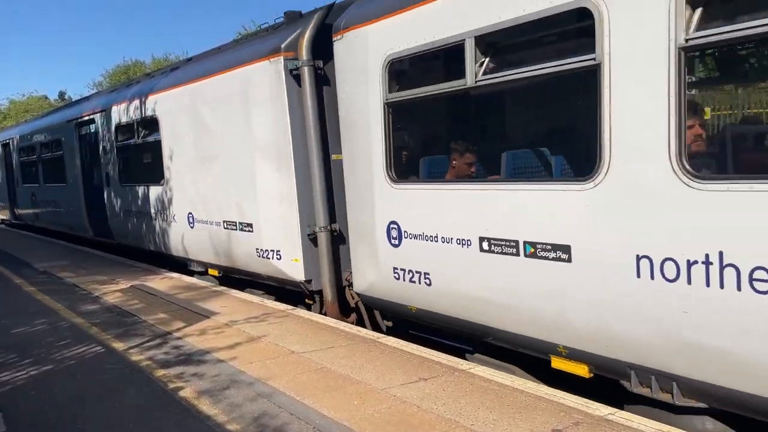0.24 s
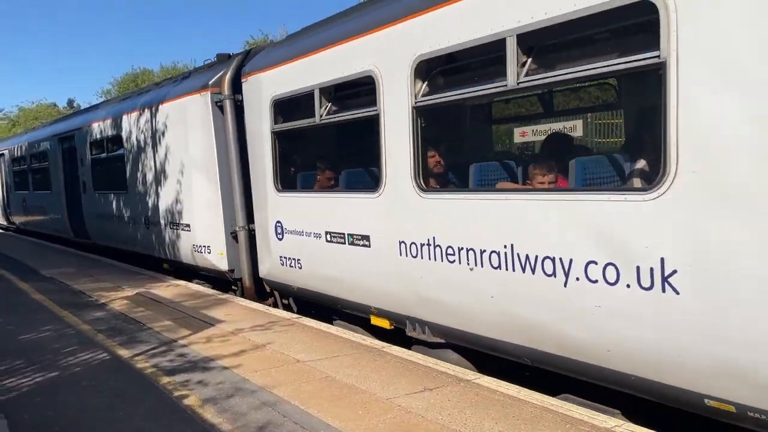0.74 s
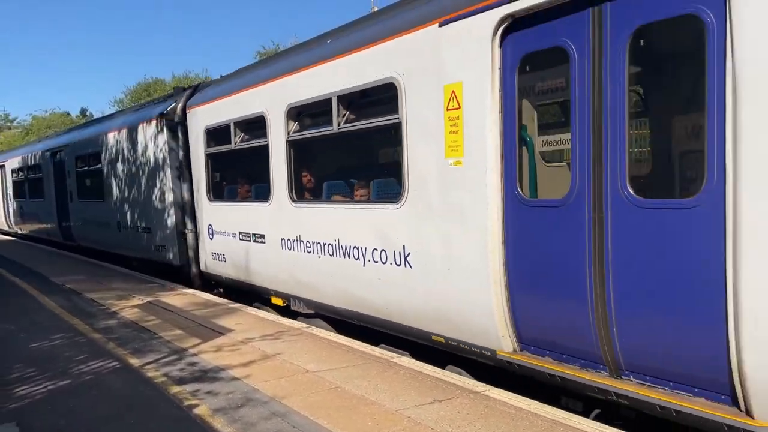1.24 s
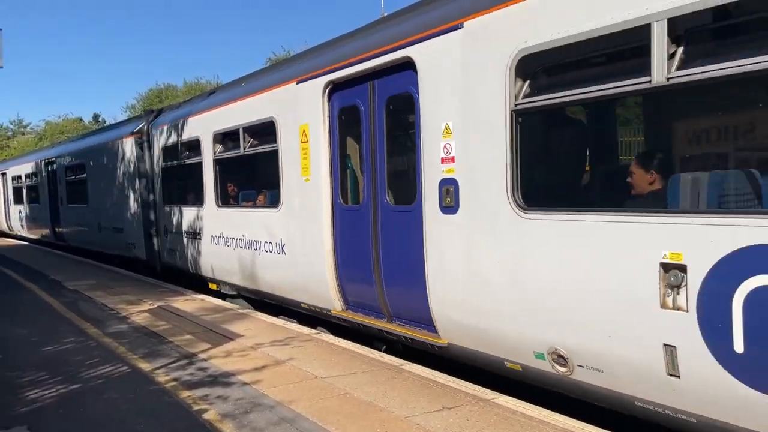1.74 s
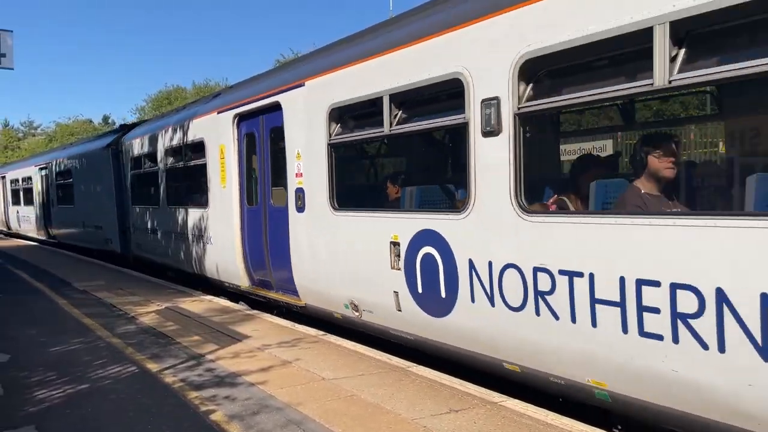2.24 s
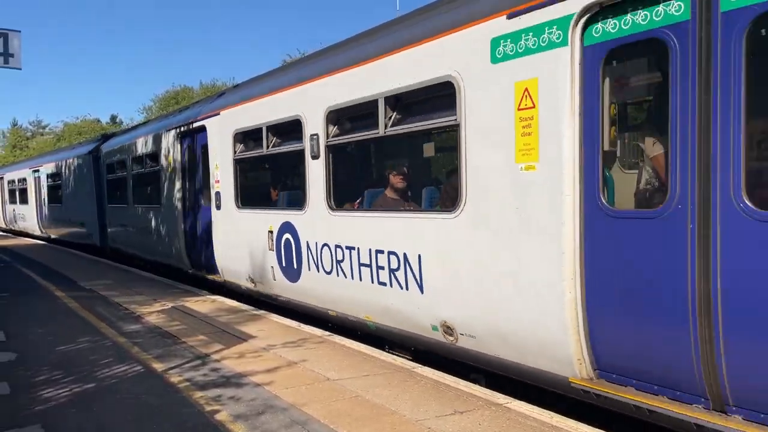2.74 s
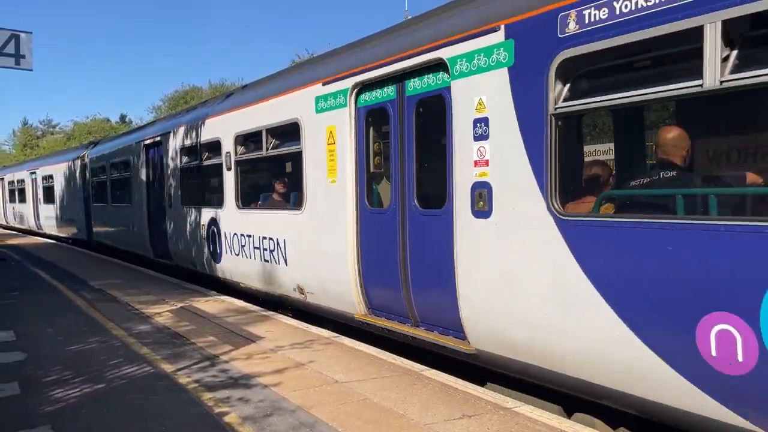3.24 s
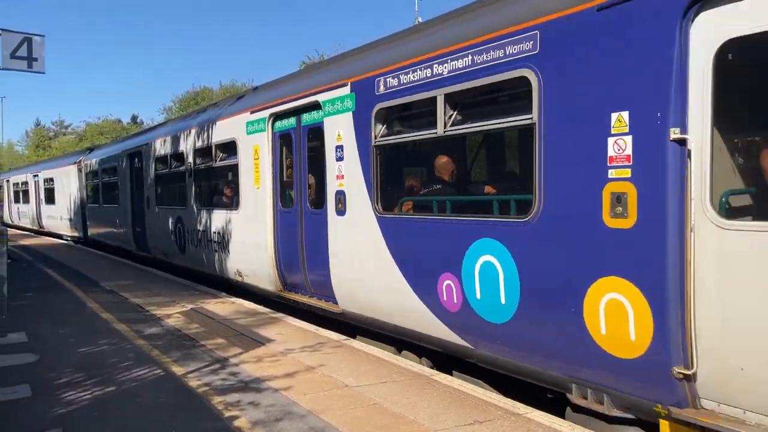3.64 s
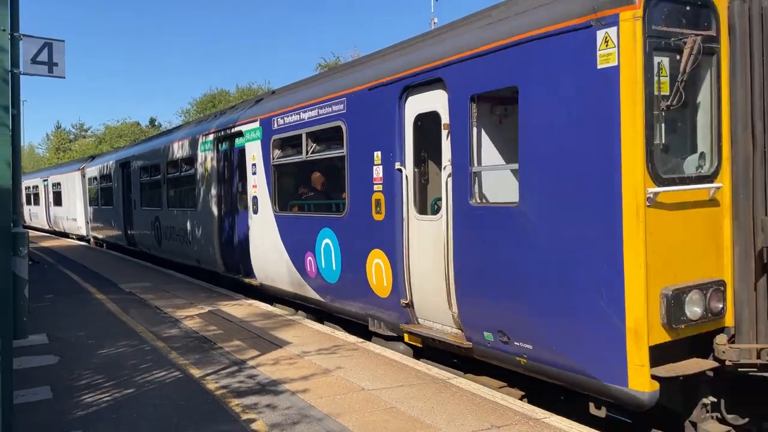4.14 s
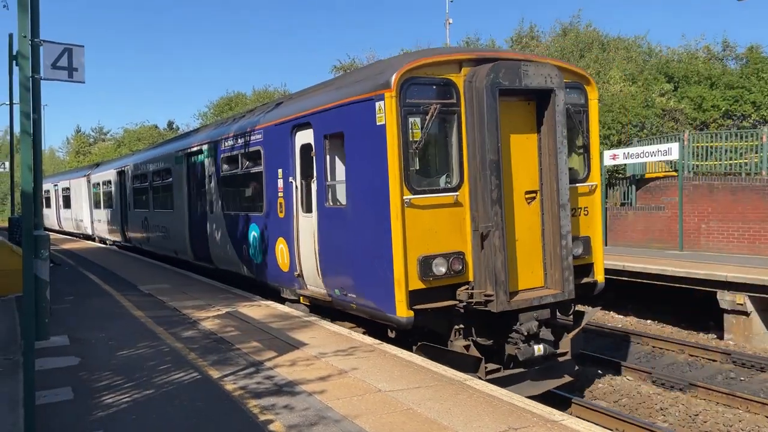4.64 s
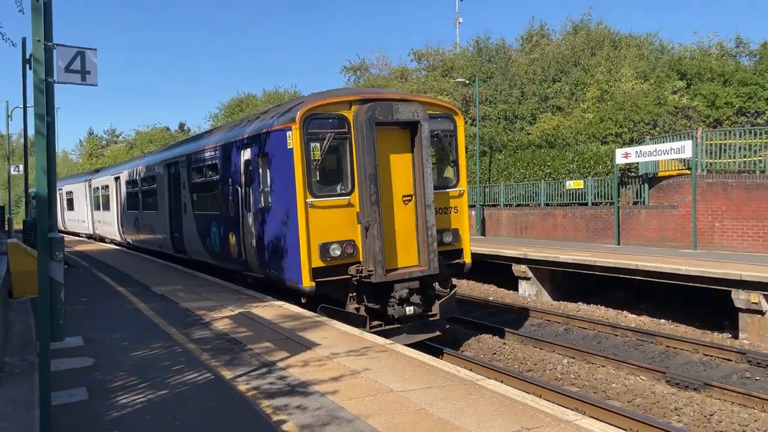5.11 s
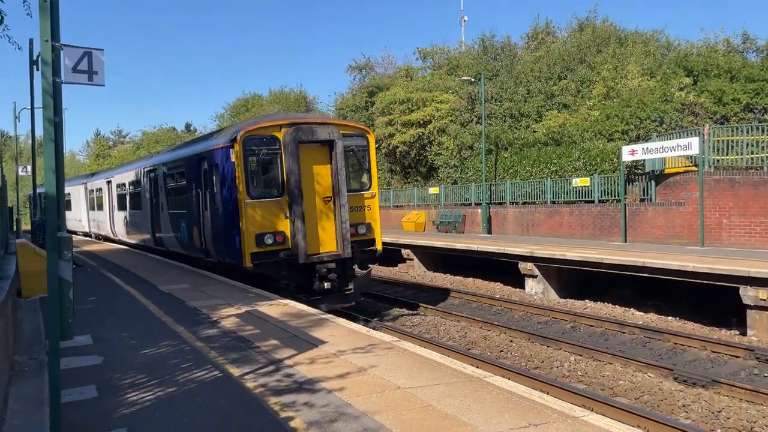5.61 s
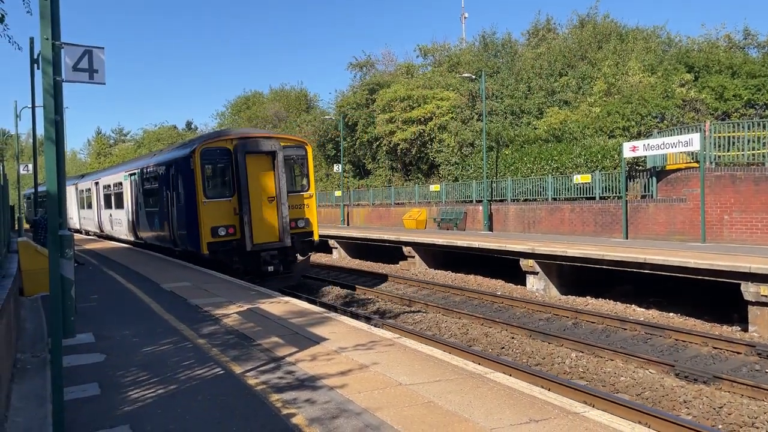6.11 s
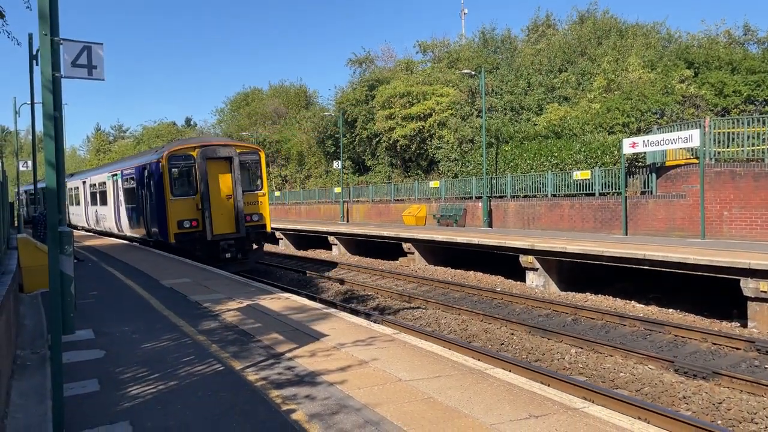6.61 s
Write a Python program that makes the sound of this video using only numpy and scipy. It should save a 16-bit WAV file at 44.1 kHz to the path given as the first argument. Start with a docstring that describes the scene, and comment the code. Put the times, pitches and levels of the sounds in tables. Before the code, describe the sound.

A diesel passenger train rolls past close by with droning engine, roar and airy hiss, then recedes before a knock and whistling air-valve blast.

```python
"""A diesel railcar's engine drone, rolling roar and cooling-air hiss pull away from an open platform.
Crank-speed orders make the exhaust and engine tones; shaped, flickering noise makes the roar and hiss.
Thin whines and a few low thuds pass. Near the end an air valve knocks open and blows through a short
pipe for a second: a noise jet plus ringing pipe resonances. Stereo is narrow in the lows, wider above."""
import sys
import numpy as np
from scipy import signal
from scipy.fft import rfft, irfft, next_fast_len
from scipy.io import wavfile

SR = 44100
rng = np.random.default_rng(int(sys.argv[2]) if len(sys.argv) > 2 else 0)


def dump_mix(stems):
    """Bounce the given channels to the path in sys.argv[1] as a 16-bit WAV at rate SR."""
    frames = np.atleast_2d(stems).T  # one column per channel
    limited = np.clip(frames, -1, 1)  # hard clip at full scale
    pcm = np.round(limited * 32767).astype(np.int16)
    wavfile.write(sys.argv[1], SR, pcm)


N = 302526


def from_db(db):
    """Amplitude gain of a level in dB."""
    return 10 ** (np.asarray(db) / 20)


def rms_one(x):
    """Scale to unit power."""
    return x / np.sqrt(np.mean(x ** 2) + 1e-20)


def after(start_s):
    """Seconds since start_s, zero before it."""
    return np.maximum(np.arange(N) / SR - start_s, 0)


def ramp(start_s, rise_s):
    """Straight rise from 0 to 1."""
    return np.clip(after(start_s) / rise_s, 0, 1)


def bell(center_s, spread_s):
    """Gaussian swell of peak 1."""
    return np.exp(-0.5 * ((after(0) - center_s) / spread_s) ** 2)


def in_time(rows):
    """Interpolate each column of a time table to every sample."""
    time_s, *columns = np.transpose(rows)
    return [np.interp(np.arange(N) / SR, time_s, column) for column in columns]


def shaped(x, points):
    """Filter by (frequency [Hz], gain [dB]) points joined on a log-frequency axis."""
    size = next_fast_len(N + 8192)
    hz = np.maximum(np.arange(size // 2 + 1) * SR / size, 1)
    point_hz, point_db = np.transpose(points)
    gain = from_db(np.interp(np.log(hz), np.log(point_hz), point_db))
    return irfft(rfft(x, size) * gain, size)[..., :N]


def drift(rate_hz):
    """Slow random curve of RMS 1: white noise through a two-pole low-pass at SR / 40."""
    r = np.exp(-80 * np.pi * rate_hz / SR)
    white = rng.standard_normal(N // 40 + 2002)
    slow = signal.lfilter([1], [1, -2 * r, r * r], white)[2000:]  # settled part
    return np.interp(np.arange(N) / 40, np.arange(len(slow)), rms_one(slow))


def noise(spectrum, patchy_db):
    """Two unrelated draws of coloured noise that flicker together."""
    coloured = rms_one(shaped(rng.standard_normal((2, N)), spectrum))
    return coloured * from_db(patchy_db * drift(12.7))


def whistles(modes, flicker_db, wander=0):
    """Noise-driven resonances, each with its own flicker; pitch strays by the share wander."""
    out, steps = np.zeros((2, N)), np.arange(N)
    for hz, width_hz, level_db in modes:
        r = np.exp(-np.pi * width_hz / SR)
        poles = [1, -2 * r * np.cos(2 * np.pi * hz / SR), r * r]
        ringing = signal.lfilter([1, 0, -1], poles, rng.standard_normal((2, N)))
        if wander:
            slip = np.cumsum(wander * drift(1.2))
            read = np.abs(steps + slip - slip[-1] * steps / N)  # ends in step again
            ringing = np.array([np.interp(read, steps, row) for row in ringing])
        level = from_db(level_db + flicker_db * drift(8.5))
        out += level * np.sqrt(width_hz) * rms_one(ringing)
    return rms_one(out)


def tone(phase):
    """A sine; its shared and differing parts stand a quarter cycle apart."""
    return np.sqrt(2) * np.array([np.sin(phase), np.cos(phase)])


# Crankshaft speed as heard, sinking as the train draws away: (time [s], speed [turns/s])
CRANK_SPEED = [(0, 31.68), (.65, 31.6), (1.45, 31.4), (2.65, 31.28), (3.85, 31.2), (4.65, 31.1),
               (5.85, 30.93), (6.86, 30.78)]


def crank_angle():
    """Crank angle in radians: running sum of the speed."""
    return 2 * np.pi * np.cumsum(in_time(CRANK_SPEED)[0]) / SR


# Roof exhaust, firing note (3rd order): (time [s], level [dB])
FIRING_LEVEL = [(0.0, -12.5), (0.05, -14.5), (0.32, -12.5), (1.18, -18), (1.57, -18), (1.97, -26.5),
                (2.33, -20), (2.64, -24), (2.69, -28), (2.86, -25), (2.92, -28), (3.36, -24.5),
                (3.44, -24.5), (4.24, -24), (4.57, -31), (4.87, -26), (4.97, -30), (5.06, -26.5),
                (5.16, -31.5), (5.6, -33), (5.66, -26.5), (5.98, -32), (6.04, -39), (6.09, -32),
                (6.74, -31.5), (6.86, -37)]
# Mean levels under random swells:
# (time [s], 6th order [dB], 7.5th [dB], 8th [dB], 9th [dB], 11th [dB])
OVERTONE_LEVELS = [(0, -32, -36, -33, -34, -23), (.6, -37, -46, -38, -31, -22),
                   (1.0, -35, -29, -39, -38, -29.5), (1.4, -42, -31.5, -37, -40, -27),
                   (2.2, -34, -37, -35.5, -39.5, -40.5), (3.1, -31.5, -40, -35.5, -36, -32),
                   (3.8, -36, -39, -37, -40, -33), (4.4, -33.5, -40, -38, -46, -32),
                   (5.2, -37.5, -52, -35, -45, -35.5), (6, -38.5, -56, -42.5, -43, -32.5),
                   (6.86, -39.5, -50, -59, -48, -40.5)]
# Overtone multiples of crank speed, in column order: (order [1], ...)
OVERTONE_MULTIPLES = (6, 7.5, 8, 9, 11)
OVERTONE_SWELL_DB, OVERTONE_SWELL_RATE_HZ = 2.5, 5.5


def exhaust(crank):
    """Firing note at three pulses per turn, plus randomly swelling overtones."""
    starts = rng.uniform(0, 2 * np.pi, 1 + len(OVERTONE_MULTIPLES))
    firing_db, = in_time(FIRING_LEVEL)
    out = from_db(firing_db) * tone(3 * crank + starts[0])
    for order, level_db, start in zip(OVERTONE_MULTIPLES, in_time(OVERTONE_LEVELS), starts[1:]):
        swell_db = OVERTONE_SWELL_DB * drift(OVERTONE_SWELL_RATE_HZ)
        out += from_db(level_db + swell_db) * tone(order * crank + start)
    return out


# Engine-block orders; half orders come from uneven cylinders:
# (multiple of crank speed [1], relative level [dB], extra once far [dB])
BLOCK_ORDERS = [(2, -6.5, 9.5), (4.5, -4.5, 8.5), (5, -6, 17), (6.5, 0.5, 9.5), (7, -10.5, 20.5),
                (10, 2.5, -6.5), (11.5, -0.5, -13), (12, -1.5, 8), (13, 4, -17), (13.5, 4, -15),
                (14, -0.5, 9), (14.5, -4.5, -18), (15, -5, -11), (15.5, -5, 0.5), (16, -8.5, 6),
                (17, -5, -19)]
GROWL_DB, GROWL_FADE_DB_PER_S, FAR_BY_S = -35, 2.45, 3.03
HIDDEN_FROM_S, HIDDEN_BY_S, HIDDEN_DB = 1.16, 2.86, -13.5


def engine_block(crank):
    """Crank orders that swell as the cylinders vary; the block passes and is soon hidden."""
    hidden = ramp(HIDDEN_FROM_S, HIDDEN_BY_S - HIDDEN_FROM_S)
    growl_db = GROWL_DB + HIDDEN_DB * hidden - GROWL_FADE_DB_PER_S * after(HIDDEN_BY_S)
    far = ramp(0, FAR_BY_S)
    out = np.zeros((2, N))
    for order, level_db, far_db in BLOCK_ORDERS:
        swell_db = growl_db + level_db + far * far_db + 2.56 * drift(3.1)
        phase = order * crank + rng.uniform(0, 2 * np.pi) + 0.32 * drift(4.0)
        out += from_db(swell_db) * tone(phase)
    return out


TAIL_PASSES_S = 4.4  # last car is by
# Injector resonances: (frequency [Hz], width [Hz], relative level per Hz [dB])
RASP_MODES = [(3710, 91, -2), (3884, 135, -0.5), (4070, 98, -10), (3234, 155, -5), (2400, 120, -14.5)]
RASP_DB, RASP_FADE_DB_PER_S = -47, 1.5
RASP_ABREAST_DB, ABREAST_S, ABREAST_SPREAD_S = -37, 1.64, 0.47


def injector_rasp():
    """Wandering noise-driven resonances, loudest abreast, fading once the last car is by."""
    steady = from_db(RASP_DB - RASP_FADE_DB_PER_S * after(TAIL_PASSES_S))
    passing = from_db(RASP_ABREAST_DB) * bell(ABREAST_S, ABREAST_SPREAD_S)
    return (steady + passing) * whistles(RASP_MODES, flicker_db=3.5, wander=0.015)


# Rolling roar: (frequency [Hz], relative level per Hz [dB])
ROAR_SPECTRUM = [(200, -66), (480, 3), (600, -2), (680, -2.5), (770, 6), (880, 1), (1000, -5.5),
                 (1200, -22), (2500, -64)]
# Fluttering resonances within the roar: (frequency [Hz], width [Hz], relative level per Hz [dB])
HOWL_MODES = [(739, 34, 1.5), (795, 40, -6.5), (818, 29, 1.5), (968, 35, -6.5)]
HOWL_RE_ROAR_DB, HOWL_FADE_DB_PER_S = 0, 2.5  # level at time 0


def rolling_roar(roar_db):
    """Wheel and gearbox noise with a howl of resonances that fades against it."""
    roar = noise(ROAR_SPECTRUM, patchy_db=1.5)
    howl = whistles(HOWL_MODES, flicker_db=3.5, wander=0.02)
    howl_db = HOWL_RE_ROAR_DB - HOWL_FADE_DB_PER_S * after(0)
    return from_db(roar_db) * (roar + from_db(howl_db) * howl)


# Cooling air: (frequency [Hz], relative level per Hz [dB])
HISS_SPECTRUM = [(900, -1.5), (1200, -1), (1400, 3), (1600, -1.5), (2400, -4.5), (2800, -8.5), (3400, -9),
                 (3800, -5), (4300, -11.5), (5500, -13), (7000, -16.5), (9000, -49)]
# Narrow rail and wheel resonances: (frequency [Hz], width [Hz], relative level per Hz [dB])
STREAK_MODES = [(1028, 45, 0.5), (1160, 18, 3.5), (1330, 18, 0.5), (1562, 26, 0.5), (1696, 22, 2.5),
                (1827, 20, 0), (2060, 16, -0.5), (2212, 32, -2.5), (2336, 40, -1), (2486, 37, -2),
                (2606, 32, -7.5)]
STREAKS_RE_HISS_DB = -5


def cooling_hiss(hiss_db):
    """Broad air noise with flickering streaks of rail and wheel ringing."""
    hiss = noise(HISS_SPECTRUM, patchy_db=0.98)
    streaks = whistles(STREAK_MODES, flicker_db=5.5, wander=0.025)
    return from_db(hiss_db) * (hiss + from_db(STREAKS_RE_HISS_DB) * streaks)


# Treble air: (frequency [Hz], relative level per Hz [dB])
TREBLE_SPECTRUM = [(5000, -25), (7000, 4), (8500, 3), (10500, 0), (13300, -4), (14200, -3), (16500, -4)]
# Air leaking through a duct, near-even spacing: (frequency [Hz], width [Hz], relative level per Hz [dB])
DUCT_MODES = [(5030, 150, 0), (6060, 120, -2), (7090, 120, -4), (8110, 120, -4), (9130, 150, -7),
              (10130, 150, -12)]
DUCT_RE_TREBLE_DB = -3


def treble_air(treble_db):
    """Treble air noise with the faint whistle of leaking air exciting duct resonances."""
    air = noise(TREBLE_SPECTRUM, patchy_db=0.6)
    duct = whistles(DUCT_MODES, flicker_db=2.2)
    return from_db(treble_db) * (air + from_db(DUCT_RE_TREBLE_DB) * duct)


# Broad noise levels; the treble lifts during the valve blow, then drops:
# (time [s], roar [dB], hiss [dB], treble air [dB])
BROAD_NOISE_LEVELS = [(0, -29, -31.5, -49), (.5, -27.5, -29, -46), (1, -24, -27, -42), (2, -24, -26, -41.5),
                      (2.5, -27.5, -27.5, -42), (3.1, -31, -30.5, -43.5), (4.2, -34.5, -32, -45),
                      (5.2, -35, -32, -46), (6.1, -35.5, -31, -42), (6.35, -38, -35.5, -52),
                      (6.86, -41, -36.5, -53)]


def broad_noises():
    """Roar, hiss and treble air, each on its own level curve, over the rumble."""
    roar_db, hiss_db, treble_db = in_time(BROAD_NOISE_LEVELS)
    return rolling_roar(roar_db) + cooling_hiss(hiss_db) + treble_air(treble_db) + rumble()


# Valve jet: (frequency [Hz], relative level per Hz [dB])
JET_SPECTRUM = [(800, -30), (1500, 0), (3000, -2), (5000, -5), (7000, -10), (9000, -13), (12000, -14),
                (13800, -19), (16500, -23)]
# Pipe resonances: (frequency [Hz], width [Hz], relative level per Hz [dB])
PIPE_MODES = [(1850, 70, -9), (2290, 120, -11), (5545, 55, -3), (6485, 60, -4), (7430, 110, -9),
              (8430, 80, -5), (9430, 200, -19), (10370, 120, -17), (11350, 100, -18), (12400, 140, -22),
              (13050, 80, -21)]
# Lowest clear pipe tone: (frequency [Hz], width [Hz], relative level per Hz [dB])
BOTTOM_MODE = (2720, 30, 0)
# It builds until 5.68 s, then wavers at a lower level: (time [s], level re other pipe tones [dB])
BOTTOM_TONE_LEVEL = [(5.3, -12), (5.42, -7), (5.56, -4), (5.68, -3), (5.74, -7), (5.92, -6), (6.0, -12),
                     (6.11, -6), (6.3, -10)]
# Blow surges: (time [s], rise [dB], spread [s])
BLOW_SURGES = [(5.59, 1.5, 0.033), (5.81, 0.5, 0.042), (6.23, 3, 0.04)]
OPENS_S, ATTACK_S, BLOW_DB, JET_RE_PIPE_DB = 5.27, 0.03, -32, -1
SAGS_FROM_S, SAG_DB_PER_S = 5.57, 10
SHUTS_S, RELEASE_DB_PER_S = 6.28, 128
PIPE_DELAY_S = 0.023  # pipe tones build after the jet


def valve_blow():
    """Air jet and the pipe tones it blows: fast opening, hold, pressure sag, shut."""
    jet = noise(JET_SPECTRUM, patchy_db=0.4)
    pipe = whistles(PIPE_MODES, flicker_db=2.8)
    bottom_db, = in_time(BOTTOM_TONE_LEVEL)
    pipe += from_db(bottom_db) * whistles([BOTTOM_MODE], flicker_db=1.0)
    flow_db = BLOW_DB - SAG_DB_PER_S * after(SAGS_FROM_S)
    for center_s, rise_db, spread_s in BLOW_SURGES:
        flow_db = flow_db + rise_db * bell(center_s, spread_s)
    blow = ramp(OPENS_S, ATTACK_S) * from_db(flow_db - RELEASE_DB_PER_S * after(SHUTS_S))
    building = ramp(OPENS_S + PIPE_DELAY_S, ATTACK_S)
    return blow * (building * pipe + from_db(JET_RE_PIPE_DB) * jet)


# Two strongest pipe tones: (frequency [Hz], width [Hz], relative level per Hz [dB])
LOWER_MODES = [(3635, 45, 0), (3700, 45, -3)]
UPPER_MODES = [(4568, 40, 0)]
# They lead in turn, before the shared gain: (time [s], lower [dB], upper [dB])
SINGING_LEVELS = [(5.26, -55, -59), (5.272, -51, -68), (5.314, -40, -46), (5.4, -37, -47),
                  (5.456, -40, -37), (5.522, -41, -41), (5.58, -31.5, -38.5), (5.66, -41, -34),
                  (5.718, -38, -43), (5.794, -35, -33), (5.818, -40, -34.5), (6.05, -37.5, -46.5),
                  (6.136, -42, -44), (6.202, -34, -45), (6.274, -39, -41), (6.358, -47, -42),
                  (6.44, -56, -72), (6.5, -66, -60)]
SINGING_GAIN_DB, SINGING_ENDS_S = 4, 6.4  # outlasts the jet


def pipe_singing():
    """Two narrow pipe resonances swelling by turns, building after the jet."""
    lower_db, upper_db = in_time(SINGING_LEVELS)
    lower = from_db(lower_db) * whistles(LOWER_MODES, flicker_db=1.2, wander=0.003)
    upper = from_db(upper_db) * whistles(UPPER_MODES, flicker_db=1.0, wander=0.003)
    building = ramp(OPENS_S + PIPE_DELAY_S, ATTACK_S)
    dying = from_db(SINGING_GAIN_DB - RELEASE_DB_PER_S * after(SINGING_ENDS_S))
    return building * dying * (lower + upper)


# Knocks as the valve opens: (time [s], peak [dB], frequency [Hz], spread [ms])
VALVE_KNOCKS = [(5.279, -36, 5450, 5), (5.325, -15.5, 270, 2.5), (5.3336, -5.5, 740, 1.5),
                (5.3525, -9.5, 150, 2.4), (5.358, -20, 330, 3.5)]


def valve_knocks():
    """Short bursts of one pitch, each under a bell-shaped swell."""
    t, out = np.arange(N) / SR, np.zeros(N)
    for center_s, peak_db, hz, spread_ms in VALVE_KNOCKS:
        cycles = np.cos(2 * np.pi * hz * (t - center_s))
        out += from_db(peak_db) * bell(center_s, spread_ms / 1000) * cycles
    return out


# Rail joints at 2.655, 4.888 and 5.94 s, body of the valve knock at 5.334 s:
# (time [s], level [dB], spread [ms], thud frequency [Hz])
THUDS = [(2.655, -27.5, 15, 740), (4.888, -28.5, 13, 465), (5.334, -25, 8.5, 500), (5.94, -33, 10, 616)]
# Thud noise: (frequency [Hz], relative level per Hz [dB])
CLUNK_SPECTRUM = [(80, -33), (150, -21), (450, 6), (750, 8), (950, -6), (1600, -50)]
PITCH_RE_NOISE_DB = -2


def thuds():
    """Low noise and one pitch under a short bell-shaped swell."""
    t, out = np.arange(N) / SR, np.zeros((2, N))
    clunk = noise(CLUNK_SPECTRUM, patchy_db=5.0)
    for center_s, level_db, spread_ms, thud_hz in THUDS:
        pitch = from_db(PITCH_RE_NOISE_DB) * tone(2 * np.pi * thud_hz * (t - center_s))
        out += from_db(level_db) * bell(center_s, spread_ms / 1000) * (clunk + pitch)
    return out


# Thin whines: (start [s], end [s], first pitch [Hz], last pitch [Hz], level [dB], waver [Hz])
WHINE_GLIDES = [(-.2, .55, 1575, 1565, -45, 4), (.12, .22, 1575, 1570, -37, 4),
                (.1, .35, 2560, 2540, -45, 10), (1.1, 2.3, 1412, 1398, -36, 22),
                (1.0, 1.6, 1690, 1720, -43, 25), (1.7, 2.25, 1680, 1750, -42, 25),
                (1.85, 2.5, 2560, 2420, -43, 30), (2.4, 4.4, 2400, 2300, -51, 40),
                (4.3, 4.85, 840, 830, -43, 10), (4.4, 5.4, 1640, 1850, -43.5, 12),
                (5.0, 7.6, 368, 364, -37, .8)]


def whines():
    """Gliding sines of wavering pitch, each under one unsteady swell."""
    t, out = np.arange(N) / SR, np.zeros((2, N))
    for start_s, end_s, first_hz, last_hz, level_db, waver_hz in WHINE_GLIDES:
        along = np.clip((t - start_s) / (end_s - start_s), 0, 1)
        hz = first_hz + (last_hz - first_hz) * along + waver_hz * drift(12)
        arch = np.sqrt(np.sin(np.pi * along) + 1e-12)
        out += from_db(level_db + 2.2 * drift(8)) * arch * tone(2 * np.pi * np.cumsum(hz) / SR)
    return out


# Rumble: (frequency [Hz], relative level per Hz [dB])
RUMBLE_SPECTRUM = [(20, -50), (33, -35), (48, -10), (62, -3.5), (80, -2), (105, 2.5), (130, -3.5),
                   (200, -0.5), (300, 0.5), (450, -5.5), (600, -17.5), (1500, -73)]
RUMBLE_DB, RUMBLE_FADE_DB_PER_S = -28.5, 3


def rumble():
    """Low noise, level until the last car is by, then fading."""
    level_db = RUMBLE_DB - RUMBLE_FADE_DB_PER_S * after(TAIL_PASSES_S)
    return from_db(level_db) * noise(RUMBLE_SPECTRUM, patchy_db=1.5)


# Stereo difference; narrow lows, treble bands that swing between in step and opposed:
# (frequency [Hz], difference over sum [dB])
STEREO_DIFFERENCE = [(60, -41), (140, -18), (320, -12.5), (740, -4), (1300, 0.5), (1900, -1), (2600, -4),
                     (4300, -4.5), (5800, -5.5), (7300, 1.5), (7750, 19.5), (8700, 36), (9100, -0.5),
                     (10000, 1.5), (10500, -35), (12300, -6), (13500, -9), (14000, 18), (14600, 45),
                     (17000, 49)]
# Stereo balance: (frequency [Hz], left over right [dB])
STEREO_BALANCE = [(60, 1.2), (200, 1.6), (370, 3), (670, 0), (2200, .5), (4100, 2), (7500, .5), (16000, 0)]
# Train moves over to the left as it leaves: (time [s], left over right [dB])
TRAIN_TURN = [(0, .3), (1.2, -0.2), (2.6, 0.5), (4, 0.2), (6.86, 1.3)]
QUARTER_CYCLE_SHARE = 0.51  # part of the difference that is the shared sound, a quarter cycle off


def stereo(common, differing):
    """Left and right from the shared and differing sound, split by frequency at constant power."""
    quarter_off = -signal.hilbert(common, next_fast_len(N)).imag[:N]
    differing = np.sqrt(1 - QUARTER_CYCLE_SHARE ** 2) * differing + QUARTER_CYCLE_SHARE * quarter_off
    sum_points = [(hz, -10 * np.log10(1 + from_db(db) ** 2)) for hz, db in STEREO_DIFFERENCE]
    side_points = [(hz, sum_db + db) for (hz, sum_db), (_, db) in zip(sum_points, STEREO_DIFFERENCE)]
    mid, side = shaped(common, sum_points), shaped(differing, side_points)
    left = shaped(mid + side, [(hz, db / 2) for hz, db in STEREO_BALANCE])
    right = shaped(mid - side, [(hz, -db / 2) for hz, db in STEREO_BALANCE])
    turn = from_db(in_time(TRAIN_TURN)[0] / 2)
    return np.array([turn * left, right / turn])


def scene():
    """Sum the sources (row 0 shared by both channels, row 1 differing) and spread them in stereo."""
    crank = crank_angle()
    engine = exhaust(crank) + engine_block(crank) + injector_rasp()
    valve = valve_blow() + pipe_singing() + valve_knocks()
    common, differing = engine + broad_noises() + valve + thuds() + whines()
    return stereo(common, differing)


CUTOFF_HZ = 15680


def record(dry):
    """Steep elliptic low-pass."""
    return signal.sosfilt(signal.ellip(12, 0.5, 80, CUTOFF_HZ, fs=SR, output="sos"), dry)


dry = scene()
out = record(dry)
dump_mix(out)
```